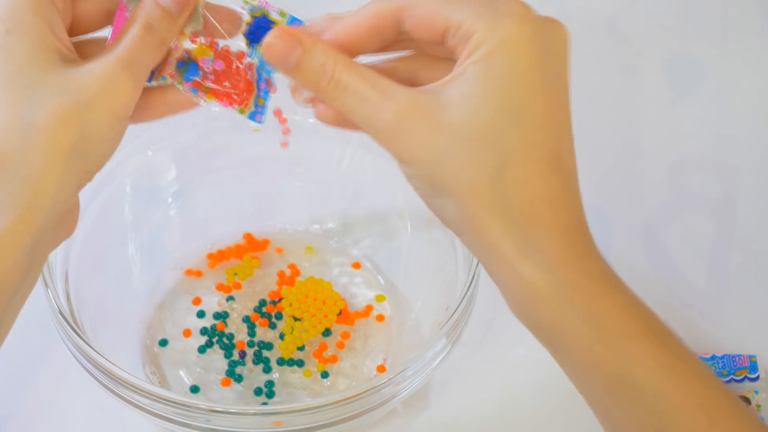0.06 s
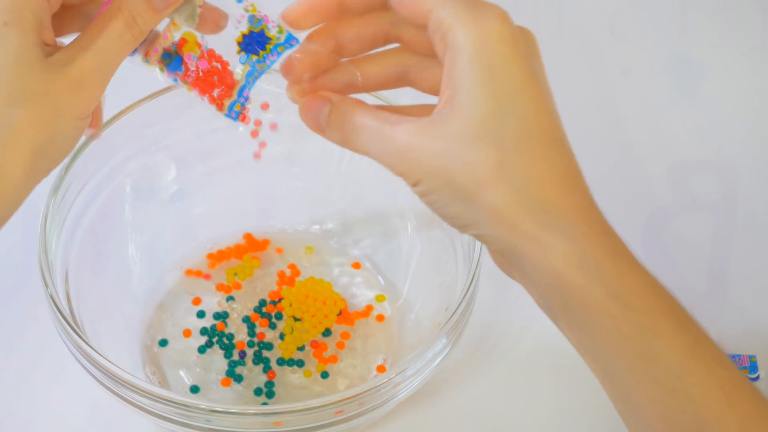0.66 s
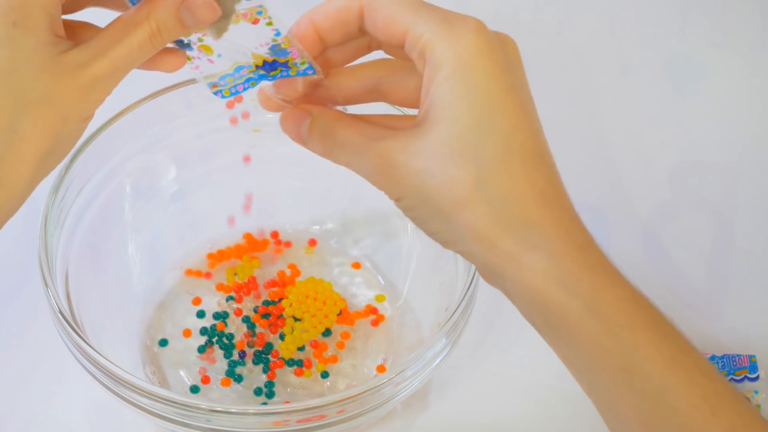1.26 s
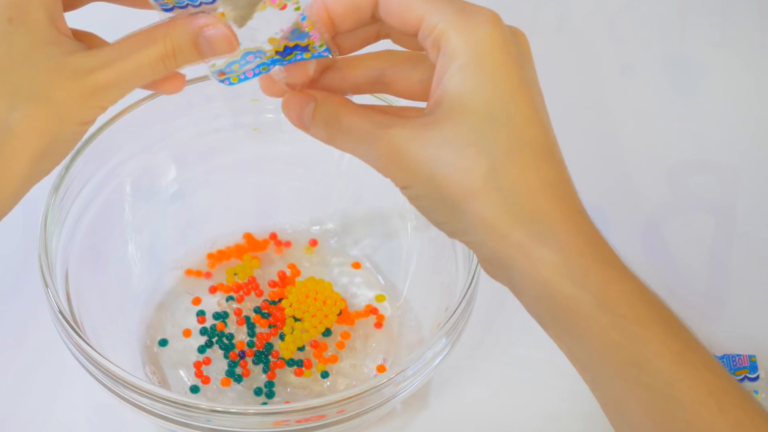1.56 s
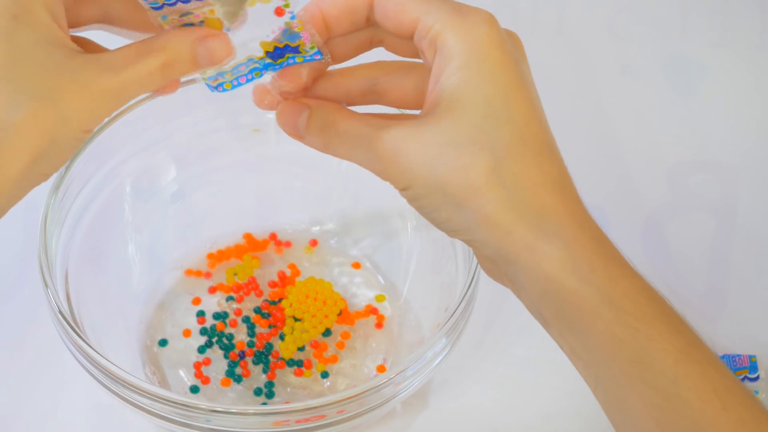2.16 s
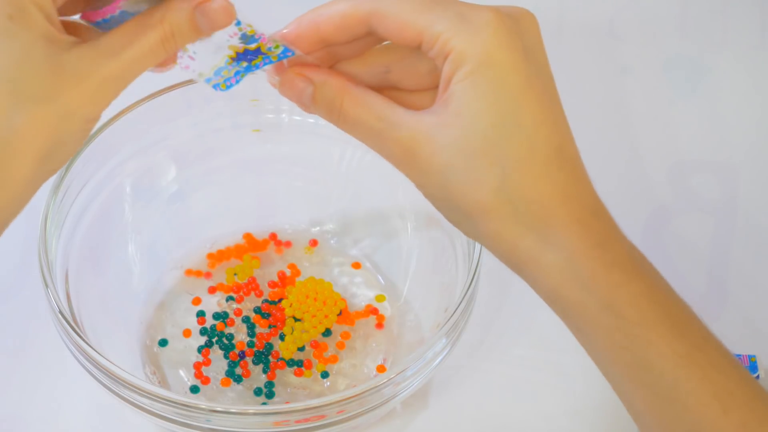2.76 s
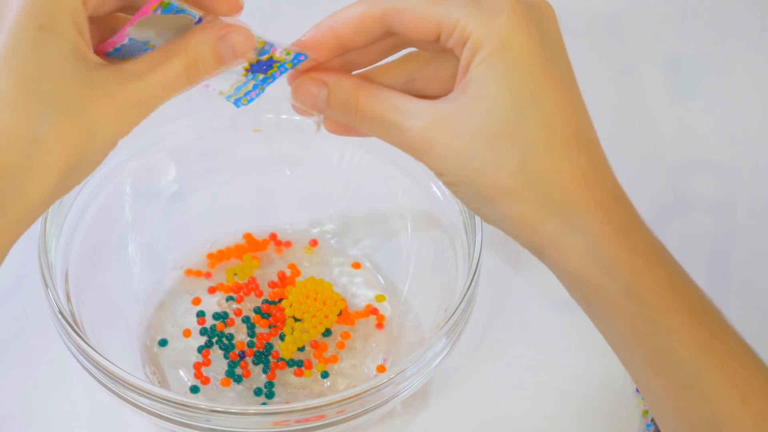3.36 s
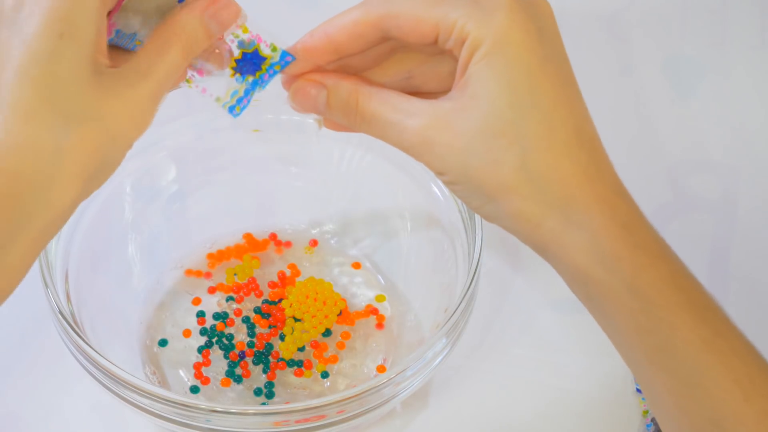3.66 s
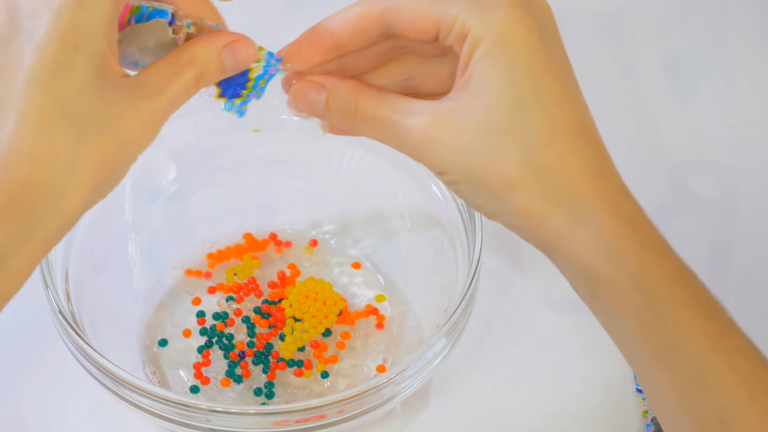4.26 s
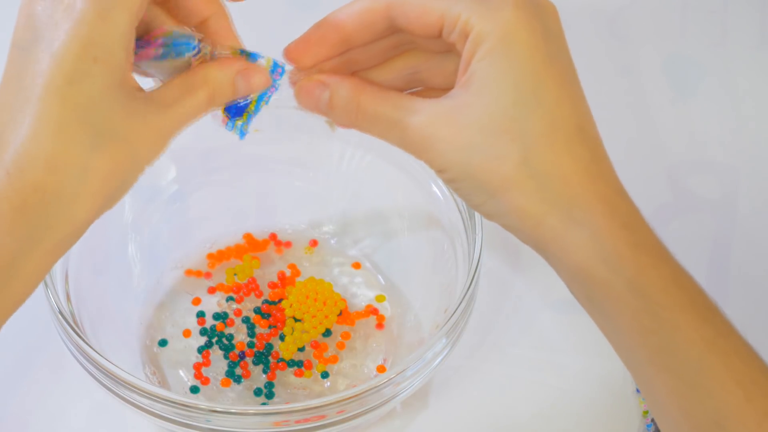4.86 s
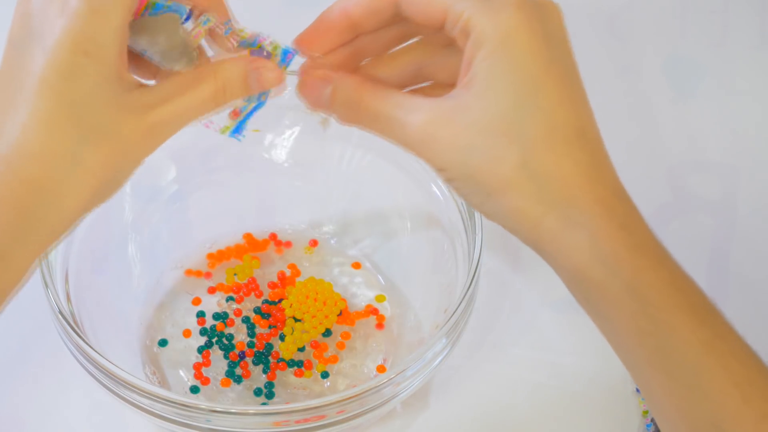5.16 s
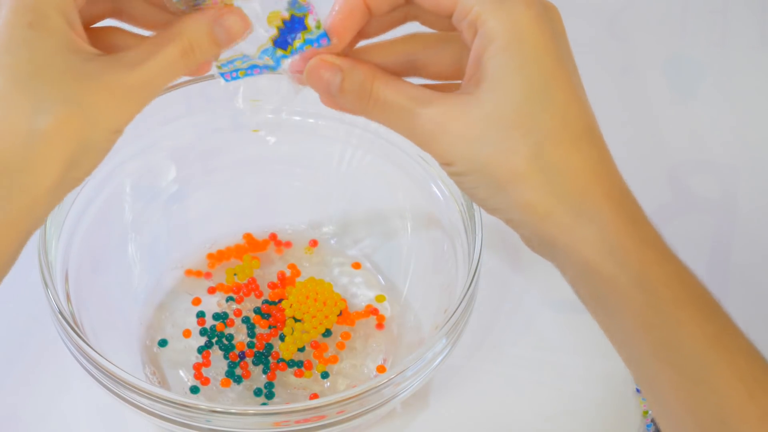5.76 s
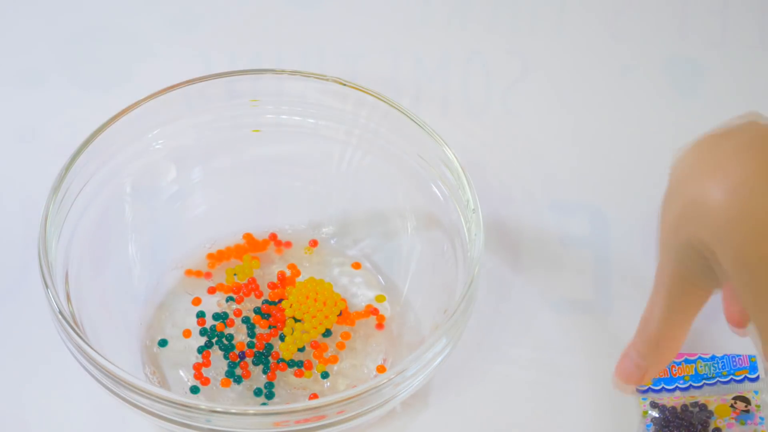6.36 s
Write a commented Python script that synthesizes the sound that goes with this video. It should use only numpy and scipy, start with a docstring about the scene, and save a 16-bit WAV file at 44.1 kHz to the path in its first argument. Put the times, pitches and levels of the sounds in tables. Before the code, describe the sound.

Close, crisp crackling of a thin plastic packet being squeezed and emptied, with a faint patter of beads landing in a bowl.

```python
"""A plastic sachet over a glass bowl

Fingers squeeze and shake a small sachet, heard close up in a small room. The film buckles in sharp
snaps and dense crinkling, and its slack panels pop with damped resonances. Soft beads patter into
the bowl. The room hums faintly, and at the end a hand bumps the table."""
import sys
import numpy as np
from scipy import signal
from scipy.fft import rfft, irfft, next_fast_len
from scipy.io import wavfile
from scipy.ndimage import uniform_filter1d

SR = 44100
rng = np.random.default_rng(int(sys.argv[2]) if len(sys.argv) > 2 else 0)


def put_to_file(sound):
    """Save the sound as 16-bit audio at rate SR, in the file named by the first command-line argument."""
    columns = np.atleast_2d(sound).T  # one column per channel
    safe = np.clip(columns, -1, 1)
    whole_steps = np.round(safe * 32767)
    wavfile.write(sys.argv[1], SR, whole_steps.astype(np.int16))


N = 286650

# big creases snapping through: start_s, level_db, panel_relative_db, crack_hz
CREASE_SNAPS = [(0.023, -10, -21, 4630), (0.0764, -9.5, -19.5, 12000), (0.1365, -3.5, -20, 3560),
                (.179, -16.5, -2.5, 3280), (0.277, -13, -16, 9400), (0.3137, -14, -7, 9800),
                (.385, -13.5, -13, 11400), (0.4403, -15, -4.5, 11100), (0.573, -25, -6, 9800),
                (.620, -21.5, -18, 10200), (0.6435, -27, 0, 9400), (.707, -20.5, -12.5, 11100),
                (0.8033, -15, -36, 6760), (0.9087, -9.5, -18, 9500), (1.1452, -20.5, -8.5, 8500),
                (1.254, -12.5, -28, 11500), (1.339, -18, -36, 10500), (1.455, -21, -22, 8000),
                (1.51, -21.5, -20, 4700), (1.585, -29, -29, 5460), (1.7802, -21, -10, 4080),
                (1.857, -22, -30, 8900), (1.9118, -17, -29, 11400), (2.0663, -23, -6, 4000),
                (2.3121, -23, -9.5, 4730), (2.5192, -17, -24, 9500), (2.5317, -16.5, -11.5, 11500),
                (2.659, -22, -22, 8850), (2.7735, -26, -24, 9800), (2.835, -15.5, -25, 10800),
                (2.93, -18, -19, 8800), (3.0783, -22, -2.5, 8700), (3.1354, -17, -20, 11900),
                (3.251, -11, -14, 8700), (3.3904, -10.5, -20, 4260), (3.5536, -18, -30, 9500),
                (3.649, -16, -18, 4200), (3.787, -17, -3, 11700), (3.947, -11, -17, 9450),
                (4.0071, -9, -14, 9000), (4.124, -13, -32, 8700), (4.15, -8.5, -26, 10400),
                (4.3309, -8, -12.5, 4430), (4.402, -6.5, -19, 11600), (4.4327, -12, -4.5, 8700),
                (4.5129, -7, -16, 9000), (4.562, -10, -12.5, 9770), (4.571, -11, -5.5, 3820),
                (4.7715, -9, -30, 10900), (5.018, -11, -17, 8750), (5.2879, -17.5, -20, 10200),
                (5.502, -14, -12.5, 4070), (5.622, -16, -10, 9500), (5.7291, -12.5, -25, 9000),
                (5.7888, -15.5, -3.5, 9700), (5.892, -13.5, -12, 3770), (6.0594, -22, -35, 5240),
                (6.0924, -19.5, -18, 11900), (6.1838, -21.5, -30, 11300)]
# spectrum of the crackling film: frequency_hz, gain_db
FILM_SPECTRUM = [(40, -37), (200, -17), (450, -7), (750, -10), (1300, -2), (2500, -1), (4300, 0),
                 (6300, -2.5), (9500, 1), (12500, -.5), (15500, -6.5)]


def snaps(crackle_db=-12, crackle_t60=0.062, clump_db=3, focus_db=5, focus_octaves=0.56):
    """Snap-through buckling: a big crease cracks and sets off a run of smaller ones."""
    out, t = np.zeros(N), np.arange(SR // 10) / SR
    for start_s, level_db, _, crack_hz in CREASE_SNAPS:
        clumps = np.minimum(rng.standard_normal(len(t)), 2)[np.arange(len(t)) // 32]
        run = unit(rng.standard_normal(len(t)) * amp(clump_db * clumps)) * (1 - np.exp(-t / 0.0014))
        burst = crack(t, jolt_db=4.5, t60=0.011) + run * amp(crackle_db - 60 * t / crackle_t60)
        # a short stiff crease cracks higher than a long one
        focus = lambda hz: np.exp(-0.5 * (np.log2((hz + 1) / crack_hz) / focus_octaves) ** 2)
        tone = lambda hz: along(FILM_SPECTRUM, hz) + focus_db * (focus(hz) - 1)
        add(out, start_s, amp(level_db + 2.5) * coloured(burst, tone))
    return out


def crack(t, jolt_db, t60):
    """Impulsive excitation: a crease gives way in one jolt, and the film shivers after it."""
    shiver = even_burst(t, t60) * (1 - np.exp(-t / 0.0007))
    return shiver + amp(jolt_db) * signal.unit_impulse(len(t), SR // 1500)


def crinkle():
    """Crackling noise: small creases buckle in crowds as the fingers squeeze."""
    crowd = ticks(per_s=1800, t60=0.0024, spread_db=2.5) * avalanches(per_s=65, t60=0.037, floor=0.17)
    creases = paced(coloured(crowd, lambda hz: along(FILM_SPECTRUM, hz)))
    # the tightest creases give lone, very bright ticks
    sharp = paced(np.diff(ticks(per_s=240, t60=0.0017, spread_db=3.5), prepend=0))
    return effort() * (amp(-0.5) * creases + amp(-5.5) * sharp)


def avalanches(per_s, t60, floor, unevenness=0.5):
    """Avalanches: each slip of the film sets off its neighbours, so the gain jumps and dies away."""
    count, t = int(2 * per_s * N / SR), np.arange(N) / SR
    slips_s = np.r_[0, np.cumsum(np.exp(unevenness * rng.standard_normal(count))) / per_s]
    since_s = t - slips_s[np.searchsorted(slips_s, t, "right") - 1]
    return floor + amp(-60 * since_s / t60)


def effort(tighten_s=0.0067, relax_db_per_s=202, hiss_floor_db=-67):
    """Power summation: squeezes tighten, hold and relax over a floor heard as a faint steady hiss."""
    # squeezes of the fingers: start_s, hold_s, level_db
    squeezes = [(0, 0.01, -34.5), (0.051, 0.015, -31), (0.132, .05, -31.5), (.213, 0.11, -40),
                (.332, 0.026, -34), (.376, 0.065, -40.5), (0.574, 0.11, -46.5), (0.83, 0.014, -40.5),
                (0.911, 0.024, -34.5), (0.968, 0.15, -41), (1.186, 0.011, -34.5), (1.256, .015, -40),
                (1.327, 0.076, -43), (1.771, 0.018, -37), (1.91, .007, -46), (2.059, 0.0046, -40.5),
                (2.147, .007, -42.5), (2.3, .005, -41), (2.413, 0.066, -45), (2.518, 0.05, -37.5),
                (2.821, 0.068, -36.5), (2.97, .005, -36), (3.066, 0.015, -35.5), (3.212, 0.029, -30.5),
                (3.351, 0.072, -37), (3.53, 0.011, -33), (3.632, 0.042, -37.5), (3.756, 0.051, -33),
                (3.847, .02, -39.5), (3.94, .1, -31), (4.157, 0.039, -28), (4.319, 0.022, -26),
                (4.364, 0.041, -31), (4.497, 0.079, -27.5), (4.655, 0.088, -33), (4.743, 0.086, -31),
                (4.962, 0.038, -30.5), (5.002, .04, -29), (5.098, 0.035, -30), (5.212, 0.15, -35.5),
                (5.528, .022, -32.5), (5.645, 0.043, -34.5), (5.702, 0.049, -32.5), (5.903, 0.035, -35.5),
                (6.083, .004, -46.5)]
    power, t = np.zeros(N), np.arange(SR) / SR
    rise = np.minimum(t / tighten_s, 1)
    for start_s, hold_s, level_db in squeezes:
        fall_db = relax_db_per_s * np.maximum(t - tighten_s - hold_s, 0)
        add(power, start_s, (rise * amp(level_db - fall_db)) ** 2)
    return np.sqrt(power + amp(hiss_floor_db) ** 2)


def tight_creases(edge_hz=4500):
    """Isolated buckling: a tight crease gives one bright tick with no run after it."""
    # lone cracks: start_s, level_db
    cracks = [(.006, -15), (.244, -15), (.434, -20), (.758, -18), (.984, -15), (2.987, -14), (3.209, -15),
              (3.358, -17), (3.41, -26), (3.434, -16), (3.625, -13.5), (3.76, -14), (3.8, -14),
              (3.825, -11), (3.864, -21), (3.874, -18), (3.927, -13), (4.055, -9.5), (4.131, -8),
              (4.266, -14), (4.315, -8.5), (4.5387, -11), (4.687, -11.5), (4.728, -11), (4.736, -8),
              (4.748, -12), (4.7986, -4), (4.817, -7), (4.826, -8), (4.854, -10), (4.961, -15), (5.044, -5),
              (5.245, -12.5), (5.709, -16), (5.738, -14), (5.803, -14), (5.834, -15.5)]
    out, t = np.zeros(N), np.arange(SR // 50) / SR
    bright = lambda hz: along(FILM_SPECTRUM, hz) - 10 * np.log10(1 + (edge_hz / (hz + 1)) ** 2)
    for start_s, level_db in cracks:
        tick = coloured(crack(t, jolt_db=3, t60=0.0081), bright)
        add(out, start_s, amp(level_db - 1.5) * tick / np.abs(tick).max())
    return out


def panels(free_t60=0.017, damped_t60=0.013, tension_octaves=0.067, mode_spread_db=3):
    """Modal ringing: slack panels pop with each snap, alone, and in a flutter under every squeeze."""
    # modes of a panel at its usual tension: pitch_hz, level_db
    modes = [(1060, -11), (1380, -7), (1660, 0), (1900, -7.5)]
    # panels flipping alone or under a sliding bead: start_s, level_db
    lone_flips = [(.600, -30), (.7294, -33), (.742, -33), (.796, -36), (.834, -35), (.988, -28.5),
                  (1.0873, -30), (1.1192, -32), (1.307, -36), (1.3793, -32.5), (2.074, -30), (2.407, -37),
                  (2.4358, -29), (2.539, -26), (3.231, -22), (3.362, -27), (3.434, -28.5), (3.553, -39),
                  (3.694, -31.5), (3.792, -23), (3.838, -24), (3.95, -22.5), (4.031, -24), (4.0563, -23.5),
                  (4.151, -23.5), (4.181, -23.5), (4.298, -28), (4.371, -22.5), (4.407, -19.5),
                  (4.515, -19), (4.663, -24.5), (4.6835, -22.5), (4.74, -24), (4.779, -21), (4.808, -22),
                  (4.993, -25), (5.117, -21), (5.135, -20), (5.155, -18.5), (5.238, -26), (5.273, -26.5),
                  (5.313, -31), (5.434, -33), (5.577, -24), (5.722, -21)]
    # how readily the panels flutter: time_s, gain_db
    slackness = [(0, -5), (.7, -7), (1.6, -8), (1.8, -4.5), (2.85, -6), (3.8, -10.5), (4.9, -11),
                 (5.15, -5.5), (6.2, -5.5)]
    out, t = np.zeros(N), np.arange(SR // 25) / SR
    mode_hz, mode_db = np.transpose(modes)[..., None]
    # a snapping crease damps its panel; a free panel rings a little longer
    flips = [(start_s, db + panel_db, damped_t60) for start_s, db, panel_db, _ in CREASE_SNAPS]
    flips += [(start_s, db - 1, free_t60) for start_s, db in lone_flips]
    for start_s, level_db, t60 in flips:
        # every flip finds the panel in a new shape and tension
        pitch_hz = mode_hz * 2 ** (tension_octaves * rng.standard_normal(mode_hz.shape))
        signs = rng.choice([-1, 1], mode_hz.shape)
        weights = amp(mode_db + mode_spread_db * rng.standard_normal(mode_hz.shape))
        ring = np.sum(signs * weights * pop(pitch_hz, t, t60), 0)
        add(out, start_s, amp(level_db) * ring / np.abs(ring).max())
    flutter = paced(pops(per_s=130, hz=1610, octaves=0.25, t60=0.007, spread_db=2.5))
    return out + effort() * amp(curve(slackness) - 2) * flutter


def jostle():
    """Granular collisions: squeezes grind the beads with a dull crunch that fades as they run out."""
    # loudness of the load left in the sachet: time_s, gain_db
    load = [(.45, -13), (1.3, -24.5)]
    crunch = paced(pops(per_s=450, hz=803, octaves=0.44, t60=0.01, spread_db=1))
    return effort() * amp(curve(load)) * crunch


def beads():
    """Random impacts: soft beads knock along the sachet's wall and land with taps and dull thuds."""
    # patter of beads leaving the sachet: time_s, level_db
    pour = [(.4, -76), (.65, -58.5), (.95, -51), (1.25, -52), (1.45, -55), (1.6, -82)]
    knocks = pops(per_s=40, hz=1624, octaves=0.1, t60=0.018, spread_db=3)
    taps = pops(per_s=230, hz=4670, octaves=0.49, t60=0.0028, spread_db=1)
    thuds = pops(per_s=90, hz=350, octaves=0.27, t60=0.028, spread_db=1)
    return amp(curve(pour)) * (amp(-6.5) * knocks + amp(-7) * taps + amp(-7.5) * thuds)


def last_beads(width_octaves=0.38, t60=0.017, flight_s=0.008, loss_db=14):
    """Inelastic rebound: a lone bead clicks on the bowl and bounces twice, weaker each time."""
    # beads striking the glass: start_s, peak_db, centre_hz
    landings = [(1.4561, -27, 3760), (1.5851, -24, 4640)]
    out, t = np.zeros(N), np.arange(SR // 25) / SR
    for start_s, peak_db, centre_hz in landings:
        band = lambda hz: -20 * np.log10(1 + (np.log2((hz + 1) / centre_hz) / width_octaves) ** 2)
        for bounce in range(3):
            click = coloured(even_burst(t, t60), band)
            click /= np.abs(click).max()
            add(out, start_s + bounce * flight_s, amp(peak_db - bounce * loss_db) * click)
    return out


def bumps():
    """Free vibration: a soft knock of the hand rings one low mode of the bowl or table."""
    # knocks of the hand: start_s, level_db, pitch_hz, t60_s
    knocks = [(.442, -27.5, 371, 0.067), (1.914, -37, 371, .06), (2.068, -34.5, 368, 0.051),
              (5.503, -37.5, 509, 0.14), (6.408, -27, 151, 0.093), (6.455, -36, 136, 0.13)]
    out, t = np.zeros(N), np.arange(SR // 4) / SR
    for start_s, level_db, pitch_hz, t60 in knocks:
        add(out, start_s, amp(level_db) * pop(pitch_hz, t, t60))
    return out


def room(x, tail_db, early_db, early_t60, side_db):
    """Reverberation: table and bowl reflect at once, the walls later."""
    # reverberation time of the room: frequency_hz, t60_s
    decay_times = [(200, 0.4), (1500, 0.47), (4000, 0.5), (9000, 0.34), (15000, 0.18)]
    out, block = np.zeros((2, N)), SR // 16
    # the reflections are redrawn for each block, so the echo has no fixed ringing colour
    for start in range(0, N, block):
        hz, frame_s, spectra = signal.stft(rng.standard_normal((2, SR // 3)), SR, nperseg=256)
        decay = amp(-60 * frame_s / along(decay_times, hz)[:, None])
        tail = signal.istft(spectra * decay, SR, nperseg=256)[1]
        t = np.arange(tail.shape[1]) / SR
        tail *= 1 - np.exp(-t / 0.0008)
        early = rng.standard_normal(tail.shape) * amp(-60 * t / early_t60)
        response = amp(tail_db) * tail / np.linalg.norm(tail[0])
        response += amp(early_db) * early / np.linalg.norm(early[0])
        add(out, start / SR, signal.fftconvolve(x[None, start:start + block], response, axes=1))
    return stereo(out, side_db)


def background():
    """Filtered noise: a broad band gives the faint air, two narrow bands a low, wavering drone."""
    # spectrum of the still air: frequency_hz, gain_db
    air_spectrum = [(25, -51), (60, -21), (100, -13.5), (150, -2.5), (250, -4), (400, -0.5), (700, -5.5),
                    (1500, -9), (3000, -10.5), (7000, -22), (15000, -48)]
    # bands of the room's drone: centre_hz, width_hz, level_db
    drone_bands = [(142, 15, -66), (188.4, 28, -56.5)]
    # brief swell of the drone: time_s, gain_db
    swell = [(1.75, 1.5), (2.15, 6), (2.45, -1)]
    air = unit(coloured(rng.standard_normal((2, N)), lambda hz: along(air_spectrum, hz)))
    drone = np.zeros(N)
    for centre_hz, width_hz, level_db in drone_bands:
        band = lambda hz: -20 * np.log10(1 + (2 * (hz - centre_hz) / width_hz) ** 2)
        drone += amp(level_db) * unit(coloured(rng.standard_normal(N), band))
    return stereo(amp(-51.5) * air, side_db=-13) + amp(curve(swell)) * drone


def pop(hz, t, t60):
    """Damped oscillation that swells over its first cycles and decays 60 dB in t60 seconds."""
    return np.sin(2 * np.pi * hz * t) * amp(-60 * t / t60) * (1 - np.exp(-hz * t))


def pops(per_s, hz, octaves, t60, spread_db):
    """Shot noise of short damped rings, each at its own pitch."""
    t = np.arange(SR // 50) / SR
    pitch_hz = hz * 2 ** (octaves * rng.standard_normal((int(per_s * N / SR), 1)))
    return scatter(pop(pitch_hz, t, t60), spread_db)


def ticks(per_s, t60, spread_db):
    """Shot noise of tiny pitchless cracks."""
    t = np.arange(SR // 150) / SR
    noise = rng.standard_normal((int(per_s * N / SR), len(t)))
    return scatter(noise * amp(-60 * t / t60), spread_db)


def scatter(grains, spread_db):
    """Superposition of grains at random times and sizes, scaled to rms 1."""
    count, length = grains.shape
    positions = rng.integers(0, N, count)[:, None] + np.arange(length)
    sizes = amp(spread_db * np.minimum(rng.standard_normal(count), 2))
    return unit(np.bincount(positions.ravel(), (grains * sizes[:, None]).ravel(), N)[:N])


def even_burst(t, t60):
    """Partial whitening: a dying noise burst holds all frequencies about equally."""
    spectrum = rfft(rng.standard_normal(len(t)) * amp(-60 * t / t60), 2 * len(t))
    magnitude = np.abs(spectrum)
    return irfft(spectrum / np.sqrt(magnitude / magnitude.mean()))[:len(t)]


def paced(x, span_s=0.03):
    """Steady energy release: single cracks vary, but the rms over a short span stays near 1."""
    local_power = np.abs(uniform_filter1d(x ** 2, int(span_s * SR)))
    return x / np.sqrt(local_power + 1e-3 * np.mean(x ** 2))


def coloured(x, db_of_hz):
    """Minimum-phase filtering: folding the cepstrum makes the gain curve causal."""
    n = x.shape[-1]
    size = 2 * next_fast_len(n // 2 + 2048)
    gain = amp(db_of_hz(np.fft.rfftfreq(size, 1 / SR)))
    cepstrum = irfft(np.log(gain + 1e-6))
    cepstrum[1:size // 2] *= 2
    cepstrum[size // 2 + 1:] = 0
    return irfft(rfft(x, size) * np.exp(rfft(cepstrum)))[..., :n]


def stereo(pair, side_db):
    """Mid-side mixing: two close microphones share most of a diffuse sound."""
    mid, side = pair
    return np.array([mid + amp(side_db) * side, mid - amp(side_db) * side])


def amp(db):
    return 10 ** (np.asarray(db) / 20)


def unit(x):
    return x / np.sqrt(np.mean(x ** 2) + 1e-20)


def along(points, hz):
    """Interpolation of (frequency_hz, value) points on a log axis."""
    points_hz, values = np.transpose(points)
    return np.interp(np.log(hz + 1), np.log(points_hz), values)


def curve(points):
    """Interpolation of (time_s, value) points at every sample."""
    return np.interp(np.arange(N) / SR, *np.transpose(points))


def add(track, start_s, sound):
    """Superposition of a sound on a track."""
    start = max(0, round(start_s * SR))
    part = track[..., start:start + sound.shape[-1]]
    part += sound[..., :part.shape[-1]]


def scene():
    """Direct and reflected sound add; the panels face the listener, so they sound drier than creases."""
    sachet = crinkle() + snaps() + tight_creases() + jostle() + beads() + last_beads()
    panel_pops = panels()
    echoes = room(sachet + amp(-6) * panel_pops, tail_db=-1.5, early_db=-6.5, early_t60=0.055,
                  side_db=-6.5)
    return sachet + panel_pops + echoes + bumps() + background()


def record(dry):
    """Soft saturation rounds the highest peaks, and a low-pass filter limits the band."""
    ceiling, cutoff_hz = 0.5, 15700
    rounded = dry / (1 + (dry / ceiling) ** 4) ** (1 / 4)
    lowpass = signal.firwin(255, cutoff_hz, fs=SR, window="blackman")
    return signal.fftconvolve(rounded, lowpass[None], "same", axes=1)


dry = scene()
out = record(dry)
put_to_file(out)
```